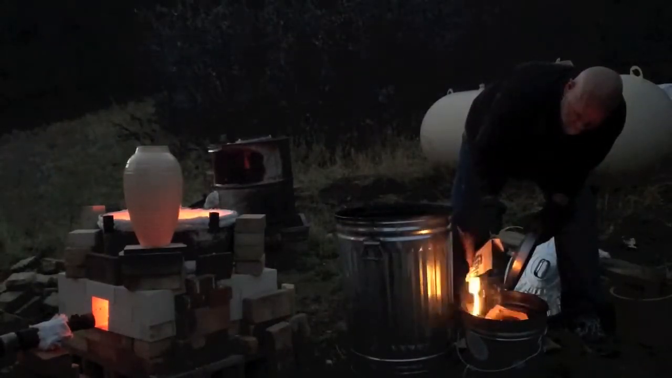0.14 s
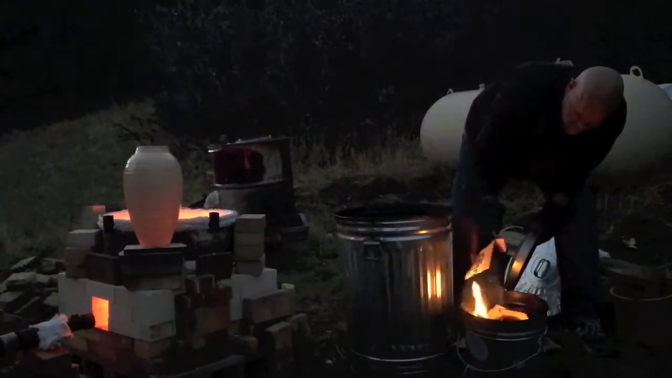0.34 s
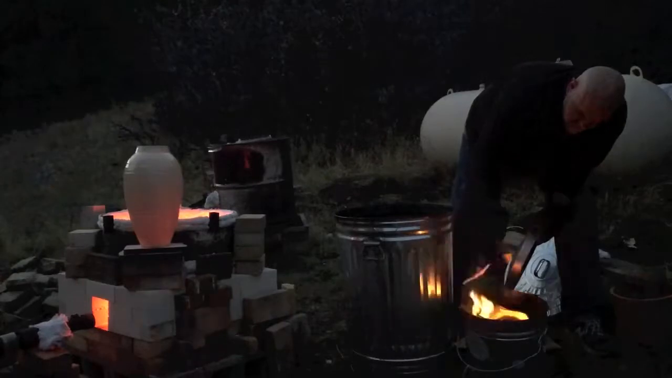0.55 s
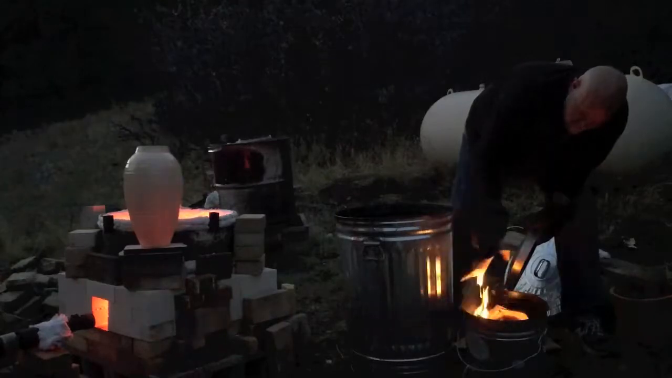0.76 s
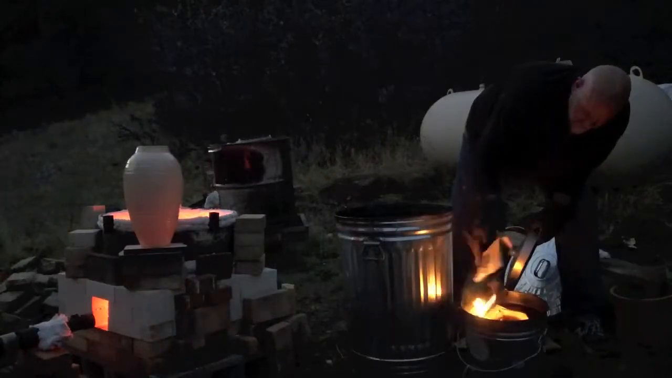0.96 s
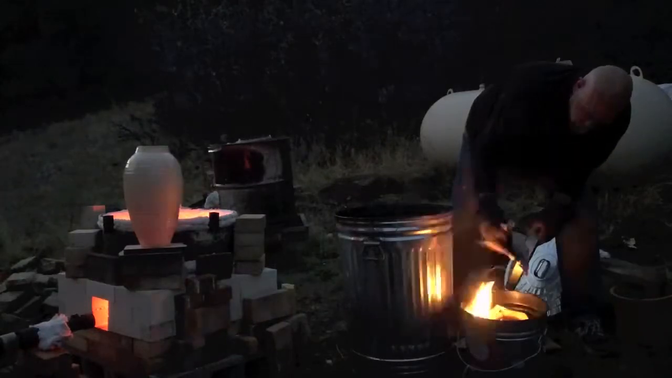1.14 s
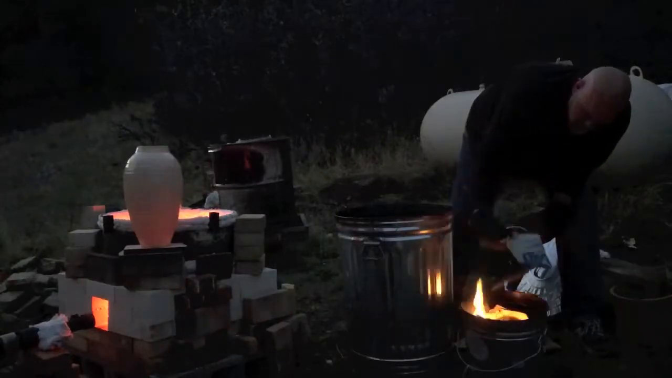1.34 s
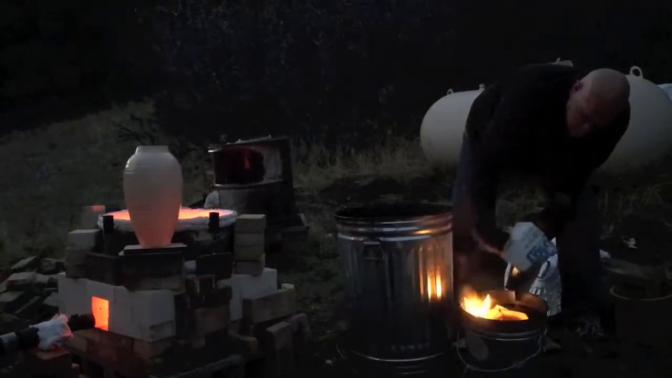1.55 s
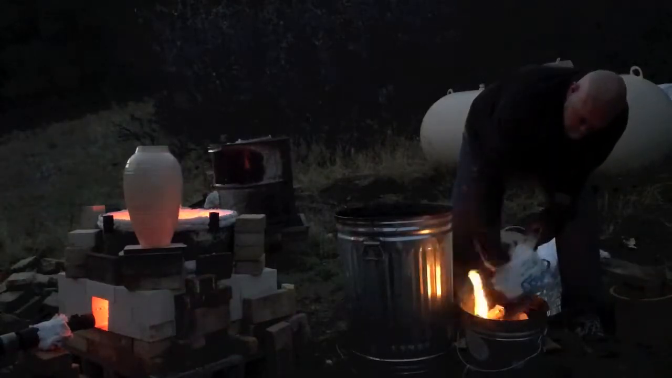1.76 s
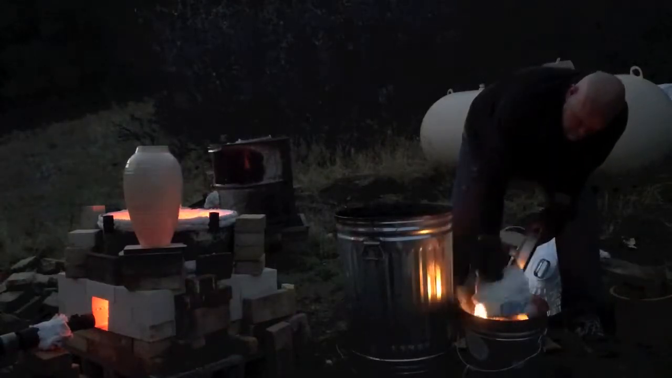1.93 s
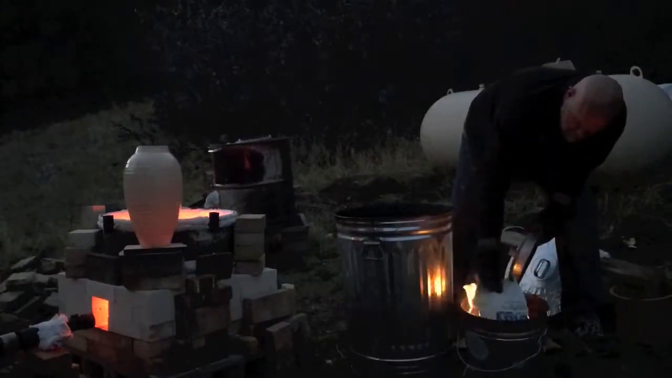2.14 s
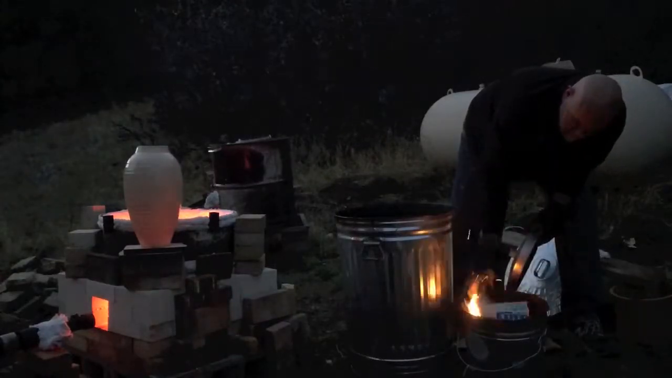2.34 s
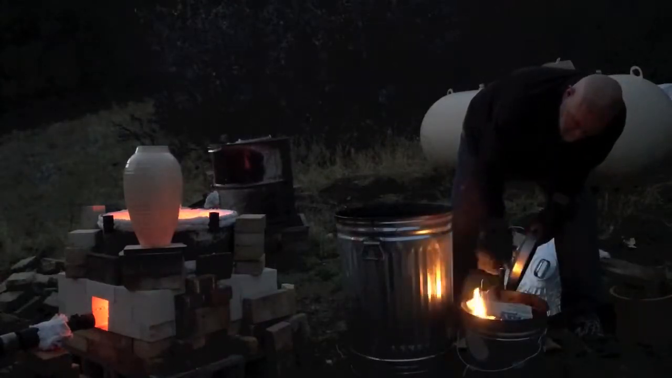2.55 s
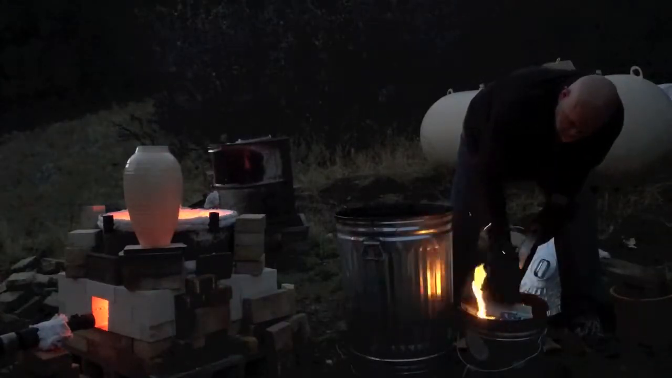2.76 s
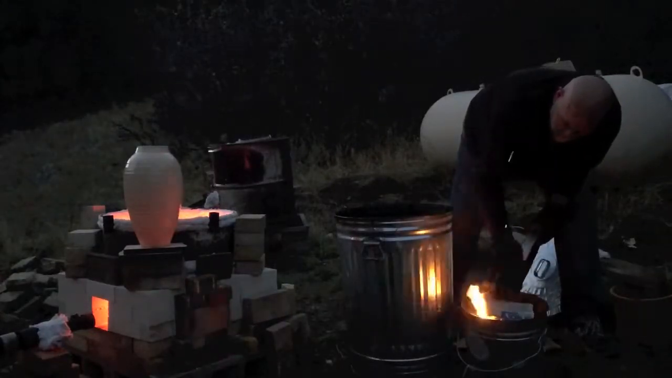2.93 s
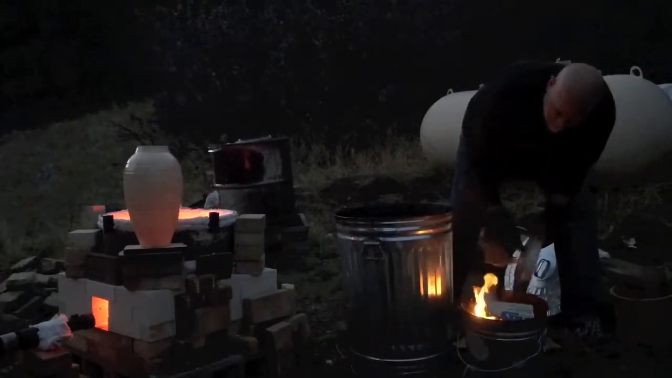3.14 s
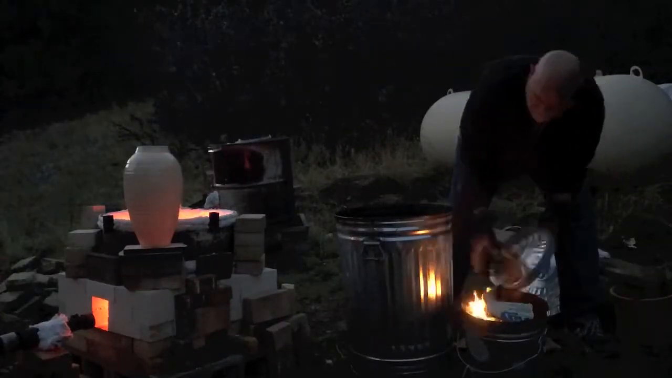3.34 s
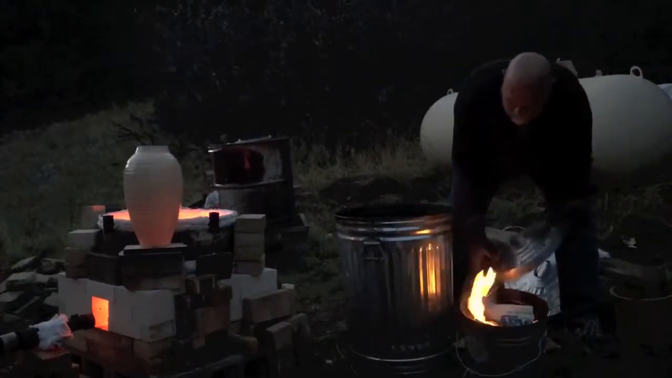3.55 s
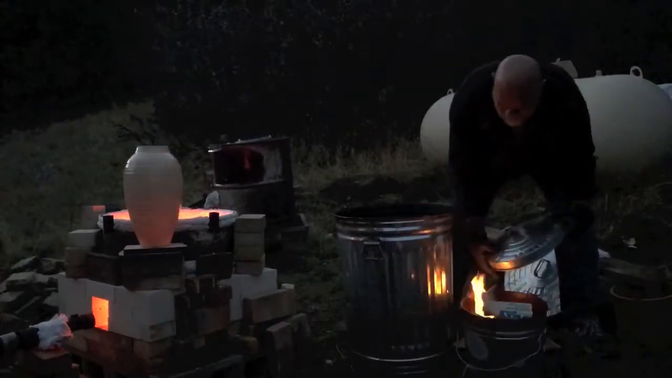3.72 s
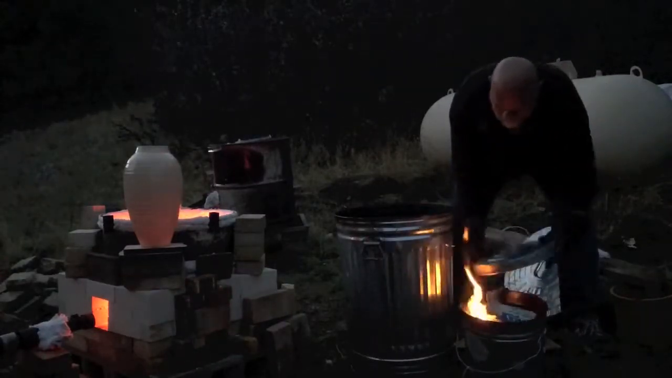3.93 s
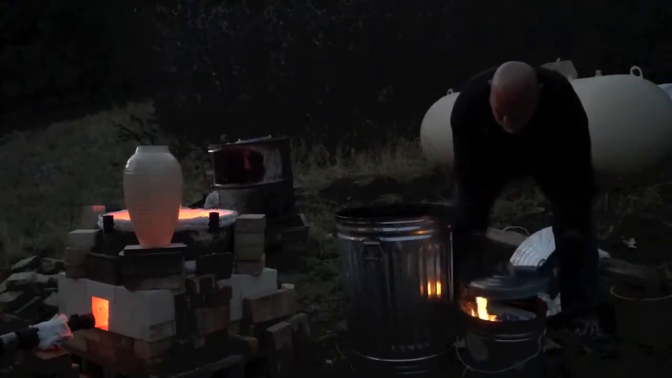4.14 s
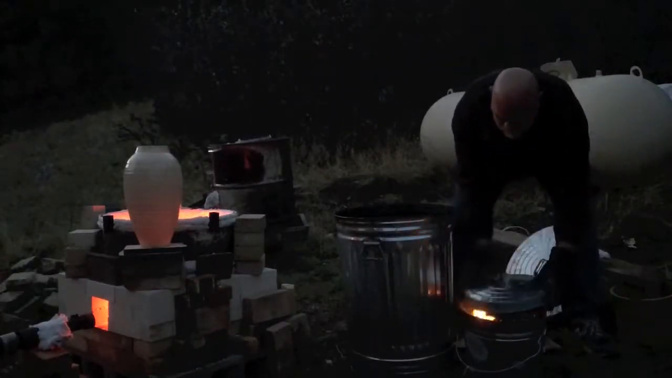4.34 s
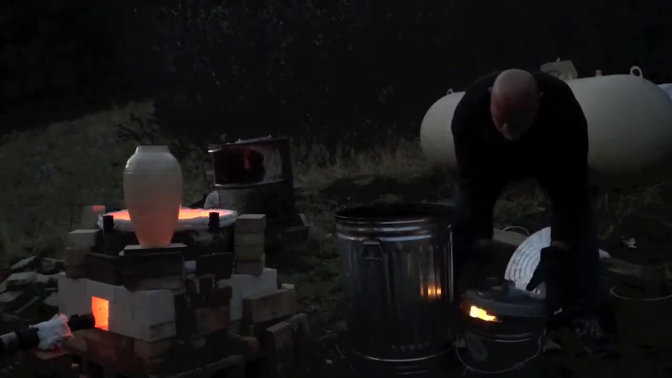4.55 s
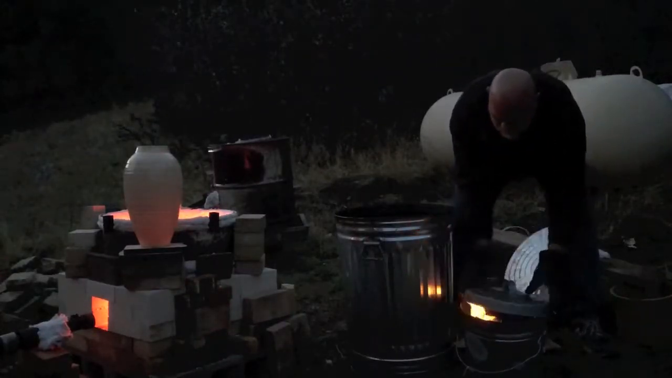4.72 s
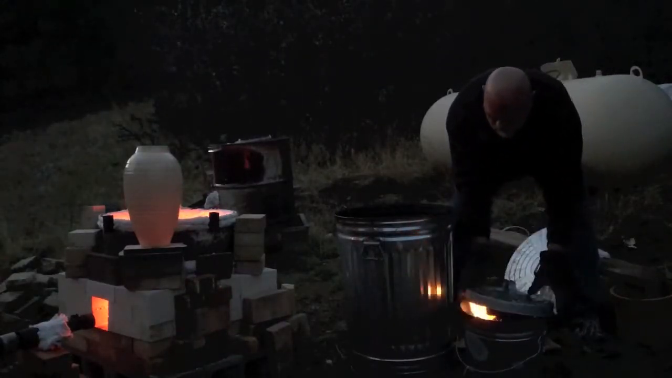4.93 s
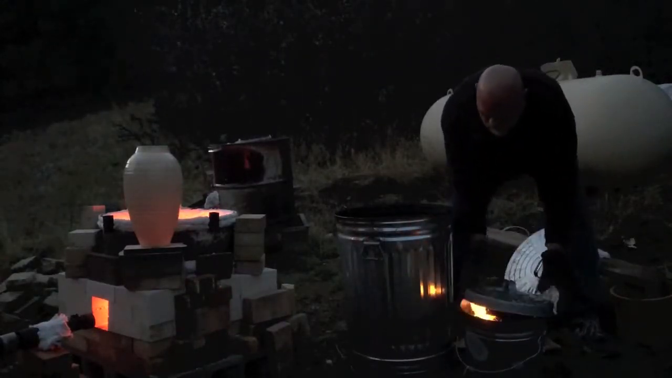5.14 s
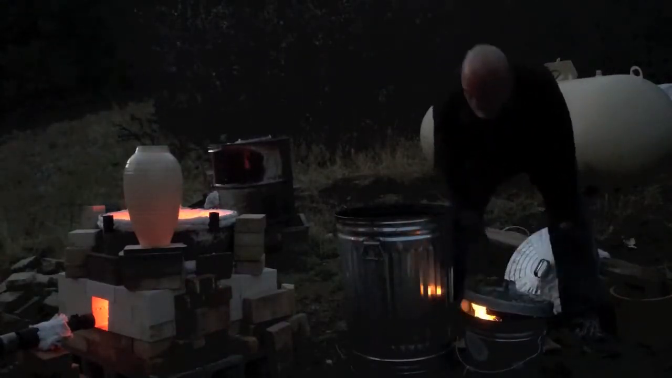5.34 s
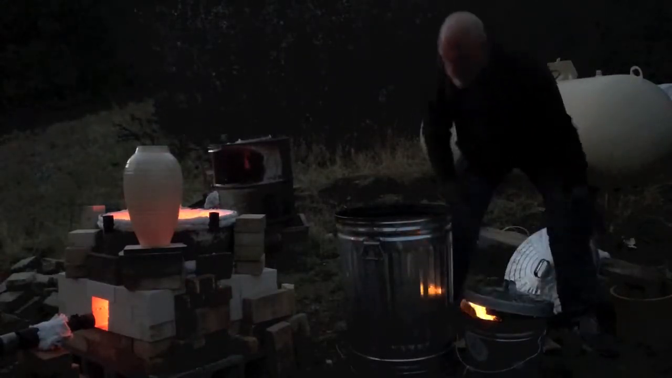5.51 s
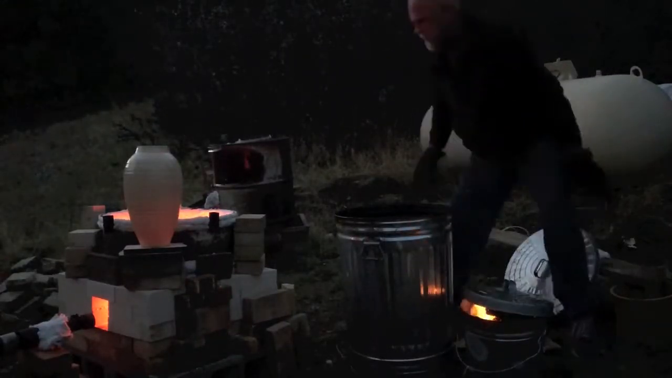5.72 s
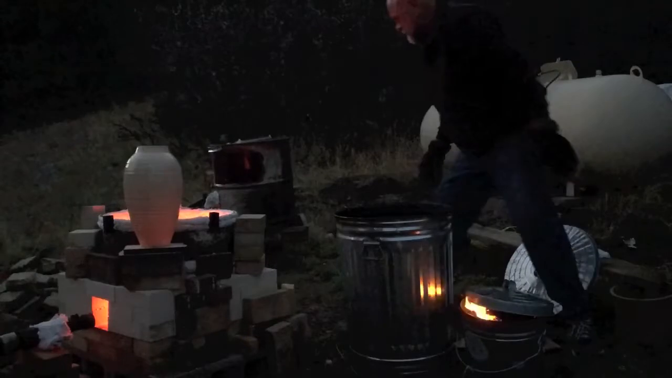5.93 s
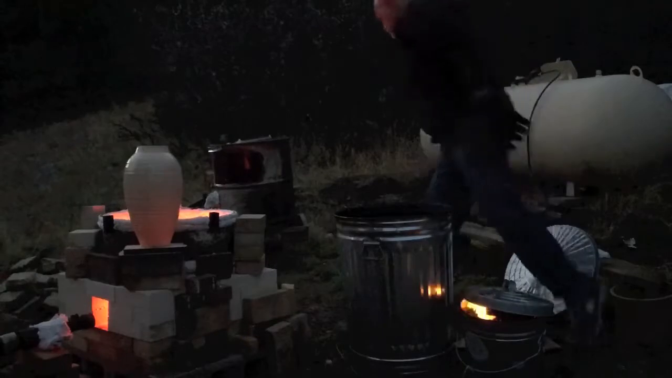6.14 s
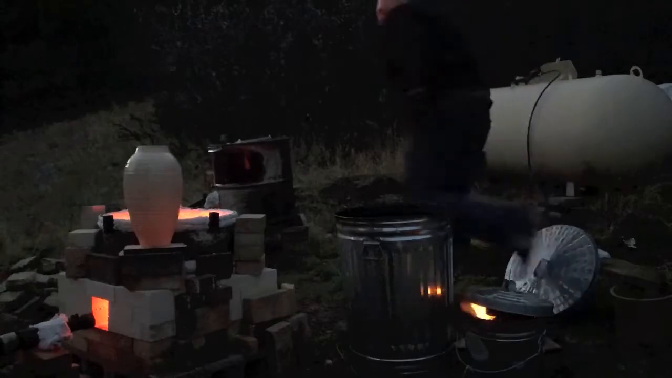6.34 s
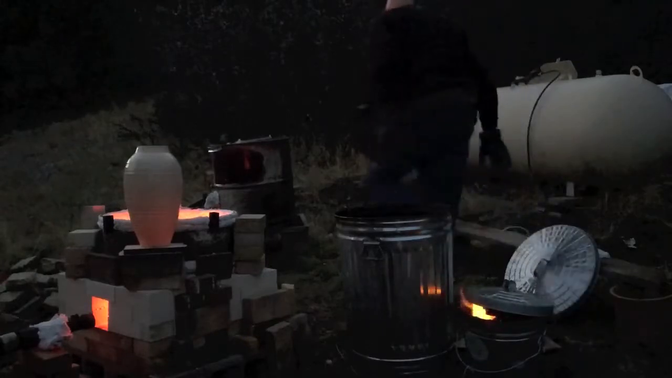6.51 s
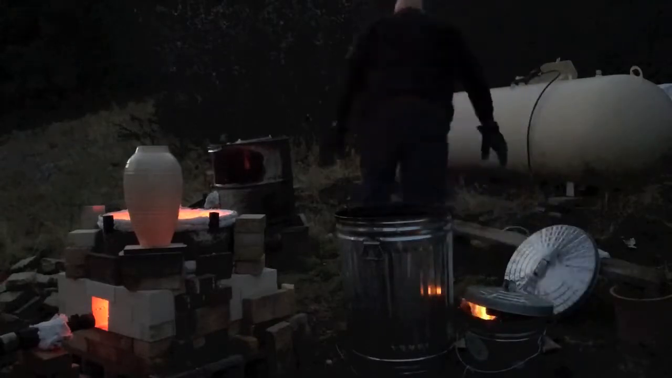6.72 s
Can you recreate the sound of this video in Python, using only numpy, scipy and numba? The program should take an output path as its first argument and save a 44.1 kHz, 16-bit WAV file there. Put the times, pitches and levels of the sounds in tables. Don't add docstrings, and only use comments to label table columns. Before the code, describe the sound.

Crackling paper is stuffed into a softly burning metal bin; a thin lid is lifted, rubbed, clanged down with a hollow boom, then boots scuff grass.

```python
import sys
import numpy as np
from numba import njit
from scipy import signal
from scipy.fft import rfft, irfft, next_fast_len
from scipy.io import wavfile
from scipy.ndimage import uniform_filter1d

SR = 44100
rng = np.random.default_rng(int(sys.argv[2]) if len(sys.argv) > 2 else 0)


def wav_out(sig):
    wavfile.write(sys.argv[1], SR, np.round(np.clip(np.atleast_2d(sig).T, -1, 1) * 32767).astype(np.int16))


def attenuation_scalar(level_db):
    decades = np.asarray(level_db, float) / 20
    return 10 ** decades


N = 298733

# (time [s], level [dB])
FLAME = [(0.0, -54), (0.36, -66.5), (0.75, -61.5), (1.13, -63), (1.39, -53.5), (2.04, -66.5), (2.16, -73.5),
         (2.9, -76.5), (3.34, -64), (3.9, -60), (5.22, -57.5), (6.11, -62.5), (6.49, -69.5), (6.77, -59.5)]
# (frequency [Hz], density [dB per Hz])
CRISP = [(710, -4.5), (1200, -1), (1350, -6), (1900, -4), (2560, -6), (4280, -3.5), (15100, -13),
         (16000, -20.5), (16500, -34)]
# (frequency [Hz], density [dB per Hz])
RUB_TONE = [(180, -37), (300, -7.5), (456, -9.5), (617, -8.5), (848, -18.5), (1800, -12.5), (5100, -12.5),
            (7260, -18), (15200, -25.5), (16500, -34)]
# (frequency [Hz], level [dB], T60 [s])
LID_MODES = [(243.6, -17.5, 0.92), (477, -3.5, 0.34), (503, -12.5, .3), (588, -12.5, 0.26),
             (637, -13.5, 0.5), (908, -14.5, 0.7), (923, -4, 0.35), (349, -27, 0.9), (1152, 2, 0.25),
             (1190, -19, 0.53), (1215, -4.5, 0.5), (1245, -11, 0.55), (1280, -13, .4), (1370, -18.5, 0.44),
             (1420, -8.5, 0.52), (1580, -12, 0.72), (1610, -18.5, 0.38), (1663, -19, 0.8), (1700, -21, 0.5),
             (1724, -18, 0.5), (1800, -11.5, 0.22), (2010, -13, 0.25), (2160, -12, 0.53), (2310, -16, .4),
             (2500, -18.5, 0.27), (2930, -9.5, 0.35), (3056, -19, 0.63), (2908, -23, 0.63),
             (3400, -13, 0.12), (4150, -18.5, .35), (4060, -20, 0.24), (4160, -10.5, 0.27),
             (4472, -18.5, .3), (4530, -14, 0.39), (4856, -10.5, .22), (5500, -11, .15)]


def evened(x):
    return x / np.sqrt(np.mean(x ** 2) + 1e-20)


def read(points, hz):
    f, value = np.transpose(points)
    return np.interp(np.log(hz + 1), np.log(f + 1), value)


def add(mix, s, sound):
    part = mix[round(s * SR):][:len(sound)]
    part += sound[:len(part)]


def placed(events):
    out = np.zeros(N)
    for s, sound in events:
        add(out, s, sound)
    return out


def coloured(x, points):
    gain = attenuation_scalar(read(points, np.fft.rfftfreq(len(x), 1 / SR)))
    return evened(irfft(rfft(x) * gain, len(x)))


def wander(count, seconds):
    size = int(seconds * SR) + 1
    once = uniform_filter1d(rng.standard_normal(count), size)
    return evened(uniform_filter1d(once, size))


def gritty(count, per_s, spread_db, smooth):
    hit, size, hiss = rng.random(count), rng.exponential(1, count), rng.standard_normal(count)
    clicks = (hit < per_s / SR) * attenuation_scalar(spread_db * np.minimum(size, 4)) * np.sign(hiss)
    return evened(clicks) + smooth * hiss


def air():
    # (frequency [Hz], density [dB per Hz])
    air_tone = [(18, -47), (30, -6.5), (139, -21), (235, -23.5), (298, -25.5), (443, -26), (577, -29.5),
                (792, -33.5), (1000, -36.5), (1240, -37), (2670, -45.5), (15200, -54), (16500, -66)]
    level_db = -70.5
    x = coloured(rng.standard_normal(N), air_tone)
    x = signal.sosfilt(signal.butter(2, 200, "high", fs=SR, output="sos"), x)
    return attenuation_scalar(level_db + 1.1 * wander(N, 0.13)) * evened(x)


def small_gulps(count):
    place, pitch, size = rng.random((count, 3)).T
    s = 0.04 + (np.arange(count) + 0.4 * place) / count * (N / SR - 0.1)
    peak_db = np.interp(s, *np.transpose(FLAME)) + 6 + 7.0 * (size - 0.5)
    hz = 70 * (0.7 + 0.6 * pitch)
    return list(zip(s, peak_db, hz))


def flame():
    # (time [s], peak [dB], pitch [Hz])
    puffs = [(0.113, -45, 61), (0.527, -44.5, 122), (0.566, -45.5, 134), (1.175, -43, 86), (1.46, -40, 105),
             (1.524, -42.5, 144), (1.616, -52, 123), (1.656, -44, 98), (1.938, -45, 109), (2.02, -40.5, 70),
             (3.47, -41, 95), (3.512, -44.5, 102), (3.746, -47, 68), (4.124, -40, 105), (4.201, -41, 90.4),
             (4.476, -43, 71), (5.285, -44, 103.9), (5.379, -40.5, 114.3), (5.694, -46.5, 105.5),
             (5.94, -47.5, 97.1), (6.205, -38.5, 47.2), (6.317, -44, 96.9), (6.39, -43.5, 92.6),
             (6.736, -48, 96.6)]
    s, level_db = np.transpose(FLAME)
    band = signal.butter(3, [33, 150], "band", fs=SR, output="sos")
    roar = signal.sosfilt(band, rng.standard_normal(N) * attenuation_scalar(5 * wander(N, 0.02)))
    out = attenuation_scalar(np.interp(np.arange(N) / SR, s, level_db) + 1.0) * evened(roar)
    t = np.arange(-0.029, 0.06, 1 / SR)
    for s, peak_db, hz in puffs + small_gulps(count=160):
        phase, long = rng.random(2)
        turns = hz * (1 - np.exp(-30 * t)) / 30 + phase
        swell = np.exp(-(t / (0.0014 + 0.013 * long)) ** 2)
        add(out, s + t[0], attenuation_scalar(peak_db - 1.0) * np.sin(2 * np.pi * turns) * swell)
    return out


def rustle():
    # (start [s], hold [s], crisp level [dB], dull body re crisp [dB])
    handfuls = [(0.43, 0.22, -80, -7), (0.943, 0.43, -82, 7.5), (1.42, 0.28, -76, -6),
                (1.861, 0.025, -60, -4), (1.953, 0.044, -52, -3.5), (1.993, 0.029, -53, 3.5),
                (2.016, .038, -57.5, 0), (2.121, 0.18, -57.5, -7.5), (2.319, 0.28, -72, 6),
                (2.62, .19, -80, 7.5), (2.831, 0.12, -71, 7), (3.033, 0.15, -83, 9),
                (5.547, 0.64, -74.5, 3.5), (6.1, 0.78, -81.5, 10.5)]
    # (frequency [Hz], density [dB per Hz])
    dull_tone = [(100, -19), (170, 4), (329, 0), (404, -18.5), (565, -4), (701, -7.5), (1040, -11),
                 (1420, -12.5), (3000, -19.5), (3900, -30), (6600, -120)]
    grab_db_per_s, let_go_db_per_s = 190, 450
    t = np.arange(next_fast_len(N)) / SR
    effort, weight = np.zeros((2, len(t)))
    for s, hold, level_db, weight_db in handfuls:
        rise_db = grab_db_per_s * np.maximum(s - t, 0)
        fall_db = let_go_db_per_s * np.maximum(t - s - hold, 0)
        stroke = attenuation_scalar(level_db - rise_db - fall_db)
        effort = np.maximum(effort, stroke)
        weight = np.maximum(weight, stroke * attenuation_scalar(weight_db))
    flicker = evened(attenuation_scalar(2.3 * wander(len(t), 0.0066)))
    crisp = coloured(gritty(len(t), 2500.0, 3.6, smooth=1.05), CRISP)
    dull = coloured(gritty(len(t), 320.0, 1.5, smooth=3.5), dull_tone)
    return (flicker * (crisp * effort + dull * weight))[:N]


def snap(s, peak_db, ring_hz, t60, share=0.16, trim_db=-3.5, wide=1.0):
    t = np.arange(12000) / SR
    away = np.log2((np.fft.rfftfreq(len(t), 1 / SR) + 1) / ring_hz)
    noise = coloured(rng.standard_normal(len(t)), CRISP)
    crack = evened(irfft(rfft(noise) * (wide + np.exp(-(away / 0.9) ** 2))))
    crack *= (0.35 + 0.64 * np.exp(-t / 0.0017)) * (1 - np.exp(-t / 0.00043))
    wobble = np.cumsum(1 + 0.015 * wander(len(t), 0.0047)) / SR
    tone = np.sin(2 * np.pi * ring_hz * wobble) * (1 - np.exp(-t * ring_hz / 0.44))
    share = np.clip(share, 0, 1)
    decay = attenuation_scalar(peak_db + trim_db - 60 * t / max(t60, 0.005))
    return s, decay * ((1 - share) * crack + share * tone)


def snap_t60(t60_at_2khz, hz):
    return t60_at_2khz * (2000 / hz) ** 0.56


def paper_snaps():
    # (time [s], peak [dB], ring [Hz])
    crease_snaps = [(0.4812, -48, 2300), (1.0319, -50.5, 5100), (1.0883, -40, 2500), (1.1441, -36, 1780),
                    (1.1826, -42, 6200), (1.3324, -53.5, 990), (1.516, -44.5, 5500), (1.5822, -45.5, 1400),
                    (1.6258, -42.5, 3720), (1.6706, -48, 8600), (1.7913, -46.5, 5950), (1.8421, -40, 2940),
                    (1.9121, -29, 2930), (1.949, -42, 1620), (1.9748, -35, 1500), (2.0787, -55, 3500),
                    (2.1128, -35, 2040), (2.172, -37.5, 1910), (2.212, -40.5, 1185), (2.2852, -57, 6000),
                    (2.3297, -40, 2810), (2.3533, -37.5, 4950), (2.4448, -49.5, 1710), (2.4738, -50, 2200),
                    (2.6125, -36, 4950), (2.8264, -38.5, 1900), (2.944, -45, 1140), (3.0125, -56, 925),
                    (1.0502, -49, 6300), (1.568, -51, 8100), (1.7756, -49.5, 2860), (1.813, -56, 1140),
                   (1.999, -35.5, 2840), (2.026, -44, 1080), (2.0995, -42, 1300), (2.133, -42, 3760),
                   (2.152, -49, 5440), (2.177, -39.5, 1050), (2.265, -41, 3000), (2.3353, -41, 2800),
                   (2.555, -56, 4580), (3.112, -53.5, 2010)]
    return placed(snap(s, peak_db, hz, snap_t60(0.075, hz)) for s, peak_db, hz in crease_snaps)


def sweep(s, level_db, half, centre_hz, octaves):
    t = np.arange(-3 * half, 3 * half, 1 / SR)
    grit = gritty(6000, 4100.0, 3.0, smooth=0.96)
    away = np.log2((np.fft.rfftfreq(6000, 1 / SR) + 1) / centre_hz) / max(octaves, 0.05)
    band = evened(irfft(rfft(grit) * np.exp(-away ** 2), 6000))
    return s + t[0], attenuation_scalar(level_db) * np.resize(band, len(t)) * np.exp(-(t / half) ** 2)


def paper_sweeps():
    # (centre [s], level [dB], half length [s])
    paper_strokes = [(0.482, -67, 0.023), (0.661, -70, 0.0076), (.96, -69, 0.007), (1.056, -68, 0.032),
                     (1.128, -61.5, 0.025), (1.364, -68.5, 0.035), (1.522, -67.5, 0.034),
                     (1.635, -66.5, 0.028), (1.867, -52.5, 0.018), (2.127, -53.5, 0.0041),
                     (2.2201, -54, 0.022), (2.2851, -50, 0.009), (2.492, -68, 0.0061),
                     (2.579, -69.5, 0.025), (2.842, -60, 0.018), (2.947, -70.5, 0.021),
                     (3.115, -85.5, .015), (6.133, -66.5, 0.031)]
    return placed(sweep(*row, centre_hz=2200, octaves=3) for row in paper_strokes)


def spit(s, peak_db):
    t60, trim_db = 0.014, -1.5
    t = np.arange(1200) / SR
    return s, attenuation_scalar(peak_db + trim_db - 60 * t / t60) * evened(np.diff(rng.standard_normal(1201)))


def spits():
    # (time [s], peak [dB])
    clicks_db = [(1.0327, -54.5), (1.087, -53), (1.1436, -42.5), (1.1817, -57), (1.3327, -57), (1.626, -54),
                 (1.671, -51), (1.73, -55), (1.7916, -53), (1.842, -54), (1.9105, -40), (2.0786, -54.5),
                 (2.0981, -56), (2.113, -35), (2.152, -47), (2.2857, -35), (2.3276, -49), (2.351, -47),
                 (2.4541, -62), (2.613, -43), (2.8239, -48.5), (2.9432, -70), (3.0124, -56.5),
                 (3.3562, -27.5), (3.658, -53), (3.7135, -55.5), (4.37, -52.5), (4.554, -34), (4.6558, -46),
                 (4.7874, -50.5), (5.584, -53.5), (6.105, -61), (6.3843, -52.5)]
    return placed(spit(*row) for row in clicks_db)


def pings():
    # (time [s], peak [dB], ring [Hz], T60 [s])
    faint_rings = [(1.089, -50, 2500, 0.045), (1.1458, -38.5, 870, 0.026), (1.346, -57, 950, 0.042),
                   (1.4357, -47.5, 238, 0.099), (2.4891, -52, 540, 0.062), (2.4901, -52, 990, 0.035),
                   (2.5545, -49, 256, .08), (2.6152, -49, 1570, 0.04), (2.8281, -47, 1870, 0.044),
                   (2.9611, -54, 1174, 0.055)]
    return placed(snap(*row, share=0.76, trim_db=-2.5, wide=0.15) for row in faint_rings)


def wall_knocks():
    # (time [s], peak [dB], ring [Hz], ring share [0-1])
    wads = [(1.5831, -52, 585, 0.6), (1.8251, -46, 1160, 0.53), (1.8581, -42.5, 2950, .9),
            (1.9124, -37.5, 3000, 1), (1.9364, -36.5, 214, 0.58), (1.9811, -38, 4500, 0.4),
            (1.9958, -33, 316, 0.44), (2.001, -34, 592, 0.3), (2.0165, -42, 238, 0.4),
            (2.0307, -43, 220, .7), (2.1741, -47, 1900, 0.84), (2.1784, -47, 850, 0.4),
            (2.3751, -46.5, 633, 0.38), (2.4451, -41.5, 599, 0.84), (2.8515, -39.5, 1140, 0.4),
            (2.8628, -37, 250, 0.63), (6.5918, -48, 460, 0.39)]
    return placed(snap(s, peak_db, hz, 0.059 * (800 / hz) ** 0.19, ring_share, trim_db=0.0, wide=0.098)
                  for s, peak_db, hz, ring_share in wads)


def fuzzy_rings():
    # (centre [s], level [dB], half length [s], centre frequency [Hz], width [octaves])
    blurs = [(2.9, -86, .02, 3030, .05), (2.715, -79, .045, 3070, .1), (6.468, -79, 0.025, 4420, .05),
             (6.455, -82, .012, 2250, .05), (6.565, -72, .015, 1670, .05), (4.8, -61, 0.016, 4900, 0.13),
             (5.9, -70, 0.011, 4600, .4), (6.525, -70, .01, 3140, .2)]
    return placed(sweep(*row) for row in blurs)


def ring(modes, t, longest):
    hz, db, t60 = np.transpose(modes)[:, :, None]
    up, down, rock = rng.random((len(hz), 3, 1)).transpose(1, 0, 2)
    turn = 2 * np.pi * hz * t + 1.0 * np.sin(2 * np.pi * (rock + (7 + 16 * up) * t))
    trio = np.sin(turn) + 0.15 * np.sin(turn * (1 + 0.025 * up)) + 0.3 * np.sin(turn * (1 - 0.018 * down))
    t60 = np.clip(t60, 0.02, longest * np.minimum(1, 1700 / hz) ** 0.31)
    out = (attenuation_scalar(db - 60 * t / t60) * trio * (1 - np.exp(-t * hz / 2.8))).sum(0)
    return out / np.sqrt(np.mean(out[:880] ** 2))


@njit(fastmath=True)
def spin(start, step, count):
    out, now = np.zeros(count), start.copy()
    for i in range(count):
        total = 0.
        for k in range(len(now)):
            total += now[k].real
            now[k] *= step[k]
        out[i] = total
    return out


def crowd(tone, count, damping):
    # (frequency [Hz], T60 [s])
    sheet_t60 = [(150, 0.1), (500, .2), (1200, 0.23), (2500, 0.19), (5000, 0.19), (9000, 0.16),
                 (16000, 0.14)]
    place, long, phase, luck = rng.random((750, 4)).T
    rank = (np.arange(750) + place) / 750
    hz = 300 + 16130 * rank ** 1.4
    t60 = damping * read(sheet_t60, hz) * (0.99 + 1.5 * long ** 3.4)
    step = np.exp((2j * np.pi * hz - np.log(1000) / t60) / SR)
    start = attenuation_scalar(read(tone, hz) + 11.0 * luck) * rank ** 0.2 * np.exp(2j * np.pi * phase)
    out = spin(start, step, min(count, int(damping * 19000)))
    out = out * signal.windows.tukey(2 * len(out), 0.2)[len(out):]
    out = np.pad(out, (0, count - len(out)))
    return out / np.sqrt(np.mean(out[:880] ** 2))


def shiver(x, depth, above_hz):
    hz, _, z = signal.stft(x, SR, nperseg=512, noverlap=384)
    re, im = rng.standard_normal(z.T.shape + (2,)).T
    flex = evened(uniform_filter1d(re, size=3, axis=1)) + 1j * evened(uniform_filter1d(im, size=3, axis=1))
    share = depth * np.clip(hz / above_hz - 1, 0, 1)[:, None]
    z = z * (1 + share * flex) / np.sqrt(1 + 2 * share ** 2)
    return signal.istft(z, SR, nperseg=512, noverlap=384)[1][:len(x)]


def lid(modes, tone, blows, damping):
    t, out = np.arange(int(0.6 * SR)) / SR, np.zeros(N)
    strong = shiver(ring(modes, t, longest=1.0), 0.8, above_hz=1300)
    attack = (1 - np.exp(-t / 0.0004)) * (1 + 0.84 * np.exp(-t / 0.0043))
    crashes = [shiver(crowd(tone, len(t), damping), 1.5, above_hz=450) * attack for _ in blows[:2]]
    for k, (s, strength_db, contact_ms, strong_db) in enumerate(blows):
        keep = np.exp(-1000 / SR / max(contact_ms, 0.005))
        body = crashes[k % len(crashes)] + attenuation_scalar(strong_db) * strong
        add(out, s, attenuation_scalar(strength_db) * signal.lfilter([1 - keep], [1, -keep], body))
    return out


def lid_lift():
    # (frequency [Hz], level [dB], T60 [s])
    lifted_modes = [(226, -20, 0.94), (487, -7, 0.39), (527, -6, 0.28), (612, -6.5, 0.28),
                    (1160, -1.5, 0.059), (1484, -13, .3), (1720, -8.5, 0.28), (1800, -16, 1),
                    (1950, -12.5, 0.61), (2136, -6.5, 0.3), (2300, -12.5, 0.52), (2400, -18, .6),
                    (2910, -12.5, 0.44), (3240, -14.5, 0.5), (3320, -17, .3), (3670, -18.5, .35),
                    (4330, -3.5, 0.13), (4950, -6, 0.22), (5500, -12, .19), (5975, -11.5, 0.27)]
    # (frequency [Hz], density [dB per Hz])
    lift_tone = [(59, -45), (100, -30), (220, -7), (320, -11.5), (405, -21), (500, -17), (602, -30),
                 (794, -17), (1510, -12), (1830, -18), (3940, -15), (4700, -14), (5500, -8), (6500, -17.5),
                 (15500, -24), (16500, -63.5)]
    # (time [s], strength [dB], contact [ms], strong modes re crowd [dB])
    lift_blows = [
        (3.3567, -25.5, 0.033, -7.5),
        (3.362, -40, 0.076, -9.5),
        (3.425, -41.5, 0.13, -5),
    ]
    return lid(lifted_modes, lift_tone, lift_blows, damping=0.71)


def thump(s, peak_db, hz, swell):
    u = np.arange(0, 12 * swell, 1 / SR) / swell
    return s, attenuation_scalar(peak_db) * u * np.exp(1 - u) * np.sin(2 * np.pi * hz * u * swell)


def thumps():
    # (time [s], peak [dB], pitch [Hz], swell [s])
    drum_notes = [(4.371, -23, 262, .0052), (3.358, -45, 310, .012), (4.554, -18, 225, .008),
                  (4.555, -19, 492, .009), (4.555, -27, 690, .006), (4.596, -23, 240, .006),
                  (4.598, -24, 520, .006), (4.661, -32, 175, .007), (3.357, -29, 232, .012)]
    return placed(thump(*row) for row in drum_notes)


def sing(count):
    # (frequency [Hz], level [dB])
    panels = [(619, 0), (1820, -1), (1990, -2), (2180, -3), (2570, -8.5), (3070, -4), (3480, -6.5),
              (3850, -8.5), (4700, -7), (5100, -2.5)]
    width_hz = 45
    out, r = np.zeros(count), np.exp(-np.pi * width_hz / SR)
    for hz, db in panels:
        rub = rng.standard_normal(count) * attenuation_scalar(3.5 * wander(count, 0.03))
        poles = [1, -2 * r * np.cos(2 * np.pi * hz / SR), r * r]
        out += attenuation_scalar(db) * evened(signal.lfilter([1, 0, -1], poles, rub))
    return evened(out)


def carry():
    # (time [s], level [dB])
    rub_levels = [(3.42, -73), (3.522, -60), (3.58, -62), (3.64, -73), (3.7, -65), (3.76, -69), (3.81, -67),
                  (3.88, -61.5), (3.97, -61), (4.04, -63.5), (4.12, -67.5), (4.2, -61), (4.27, -68),
                  (4.35, -60.5), (4.446, -70.5), (4.563, -50.5)]
    s, level_db = np.transpose(rub_levels)
    t = np.arange(s[0], s[-1], 1 / SR)
    scrape = coloured(gritty(len(t), 1400.0, 3.1, smooth=1.0), RUB_TONE)
    out = 0.26 * scrape * attenuation_scalar(0.7 * wander(len(t), 0.0067))
    for _ in range(3):
        grip = rng.standard_normal(len(t)) * attenuation_scalar(4.5 * wander(len(t), 0.014))
        out += 0.59 * evened(signal.fftconvolve(grip, crowd(RUB_TONE, 12000, 0.18))[:len(t)])
    out += 0.78 * sing(len(t))
    out *= attenuation_scalar(np.interp(t, s, level_db) + 0.2) * signal.windows.tukey(len(t), 0.05)
    return placed([(s[0], out)])


def squeak(s, peak_db, half, hz, overtone_db):
    t = np.arange(-3 * half, 3 * half, 1 / SR)
    turn = 2 * np.pi * hz * t
    tone = np.sin(turn) + attenuation_scalar(overtone_db) * np.sin(2 * turn)
    return s + t[0], attenuation_scalar(peak_db) * np.exp(-(t / half) ** 2) * tone


def handle_squeaks():
    # (centre [s], peak [dB], half length [s], pitch [Hz], overtone re pitch [dB])
    slips = [(3.532, -33.5, 0.0054, 1750, -12.5), (3.541, -36, 0.0036, 1740, -31),
             (3.554, -38.5, 0.0044, 1760, -22), (3.562, -44, 0.0039, 1720, -11),
             (3.582, -45, 0.0063, 1736, -18), (3.595, -46.5, 0.0094, 1750, -36),
             (3.605, -54, 0.0031, 1780, -21), (3.614, -49, 0.0036, 1710, -28),
             (3.62, -49, 0.0041, 1750, -26), (3.641, -57, 0.017, 1750, -28)]
    return placed(squeak(*row) for row in slips)


def carry_taps():
    # (time [s], strength [dB], contact [ms], strong modes re crowd [dB])
    tap_blows = [(3.66, -49.5, 0.023, -11), (3.713, -54, 0.0054, -30), (3.831, -61, 0.007, 2.5),
                 (3.939, -65, 0.086, -3.5), (4.173, -62.5, 0.024, -5.5), (4.484, -62.5, 0.09, -5.5)]
    return lid(LID_MODES, RUB_TONE, tap_blows, damping=0.44)


def grips():
    # (time [s], peak [dB], ring [Hz], T60 [s])
    panel_rings = [(3.6681, -47.5, 619, 0.27), (3.7139, -50, 2500, 0.092), (3.7147, -50.5, 943, 0.29),
                   (3.7155, -50, 4150, 0.046), (3.7163, -53, 2910, 0.12), (3.7171, -48.5, 4500, 0.05),
                   (3.837, -48.5, 5600, 0.096), (3.8451, -48, 607, 0.27), (3.8621, -58, 1824, 0.52),
                   (3.8641, -55, 2200, 0.046), (3.9281, -54, 3000, .05), (3.9441, -49, 1950, 0.045),
                   (3.9481, -49, 1134, .06), (3.9961, -46, 3050, 0.042), (4.0021, -45.5, 2700, 0.035),
                   (4.0301, -57, 3920, 0.13), (4.0451, -60, 2190, 0.34), (4.1301, -62, 1822, 0.81),
                   (4.1741, -62, 952, 0.43), (4.1761, -60, 2200, .06), (4.2051, -56, 5300, .06),
                   (4.3271, -61, 1800, 0.19), (4.4861, -56, 1800, 0.32), (4.7861, -60, 3760, 0.093),
                   (4.7881, -56.5, 4950, 0.21)]
    return placed(snap(*row, share=0.78, trim_db=0.0) for row in panel_rings)


def glove_sweeps():
    # (centre [s], level [dB], half length [s])
    cloth_strokes = [(3.6781, -51, 0.018), (3.8401, -56.5, .014), (3.8681, -60.5, 0.014),
                     (3.9481, -68, 0.027), (4.0001, -63, 0.011), (4.1871, -57.5, 0.033),
                     (4.5291, -60.5, 0.03), (4.7621, -69, 0.05), (6.5571, -65, 0.033)]
    return placed(sweep(*row, centre_hz=2000, octaves=1.5) for row in cloth_strokes)


def lid_touch():
    # (frequency [Hz], level [dB], T60 [s])
    touched_modes = [(523, 0.5, 0.031), (950, -8.5, 0.13), (1140, -13, 0.07), (2200, -14, 0.19)]
    # (frequency [Hz], density [dB per Hz])
    touch_tone = [(59, -59), (100, -33), (279, -6), (427, -27), (518, -7), (778, -20), (1140, -18.5),
                  (1440, -27.5), (3000, -32.5), (5000, -42.5), (16500, -43.5)]
    # (time [s], strength [dB], contact [ms], strong modes re crowd [dB])
    touch_blows = [(4.37, -36, 0.011, -9.5)]
    return lid(touched_modes, touch_tone, touch_blows, damping=0.65)


def lid_drop():
    # (frequency [Hz], density [dB per Hz])
    drop_tone = [(59, -53), (100, -32.5), (225, -3.5), (400, -29), (496, -16.5), (615, -8), (811, -12.5),
                 (1190, -10.5), (1350, -20.5), (2030, -11.5), (3000, -11), (7330, -16.5), (15100, -25.5),
                 (16500, -50)]
    # (time [s], strength [dB], contact [ms], strong modes re crowd [dB])
    drop_blows = [
        (4.553, -17, 0.053, -8.5),
        (4.558, -22, 0.74, -3),
        (4.582, -32, 0.061, 0),
        (4.6, -33.5, 0.018, -1),
        (4.657, -49, 0.012, 8),
        (4.788, -53.5, 0.0096, -11),
    ]
    return lid(LID_MODES, drop_tone, drop_blows, damping=0.81)


def afterglow():
    # (frequency [Hz], density [dB per Hz])
    glow_tone = [(300, -14.5), (700, -7), (1300, -0.8), (1800, -4), (2600, -8), (5000, -13), (9000, -29)]
    # (time [s], strength [dB], contact [ms], strong modes re crowd [dB])
    glow_blows = [(4.556, -45, .03, -29)]
    return lid(LID_MODES, glow_tone, glow_blows, damping=2.5)


def stalk_snaps():
    # (time [s], peak [dB], ring [Hz])
    stalks = [(5.5829, -49.5, 5700), (5.6145, -53, 1560), (6.1323, -43.5, 1960), (6.3855, -51.5, 4900),
              (6.5512, -54, 1750), (6.6814, -59, 3030)]
    return placed(snap(s, peak_db, hz, snap_t60(0.13, hz)) for s, peak_db, hz in stalks)


def boot_sweeps():
    # (centre [s], level [dB], half length [s])
    scuffs = [(5.608, -67, 0.03), (5.78, -67.5, 0.043), (6.4, -67.5, 0.0086)]
    return placed(sweep(*row, centre_hz=980, octaves=1) for row in scuffs)


def stem_breaks():
    # (time [s], peak [dB], ring [Hz])
    stems = [(5.7696, -57, 1720), (5.8797, -71, 1800), (6.105, -57, 3320), (6.519, -58, 3080),
             (6.575, -53, 1790), (6.5986, -56.5, 1545), (6.6984, -64, 2450), (6.744, -54.5, 1490)]
    return placed(snap(*row, t60=0.071, trim_db=-3.0) for row in stems)


def scene():
    mix = air() + flame()
    mix += rustle() + paper_snaps() + paper_sweeps() + spits() + pings() + wall_knocks() + fuzzy_rings()
    mix += lid_lift() + thumps()
    mix += carry() + handle_squeaks() + carry_taps() + grips() + glove_sweeps()
    mix += lid_touch() + lid_drop() + afterglow()
    mix += stalk_snaps() + boot_sweeps() + stem_breaks()
    return mix[None]


def band_limit(x):
    return signal.sosfilt(signal.butter(12, 16800, fs=SR, output="sos"), x)


def record(dry):
    return band_limit(dry)


dry = scene()
out = record(dry)
wav_out(out)
```